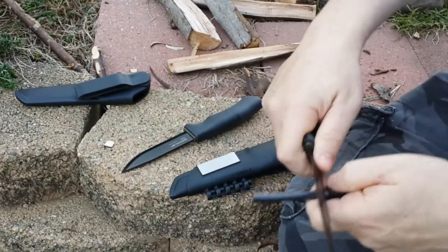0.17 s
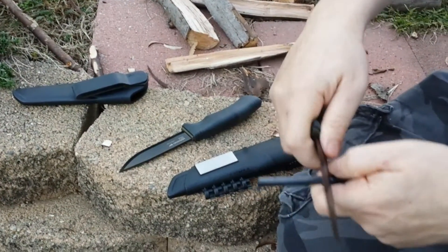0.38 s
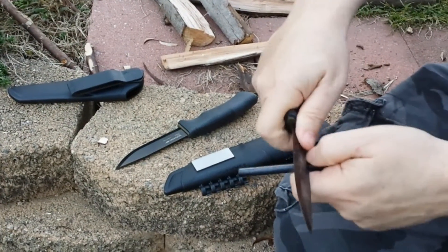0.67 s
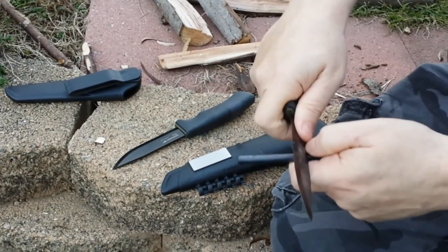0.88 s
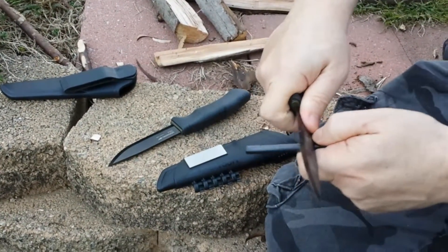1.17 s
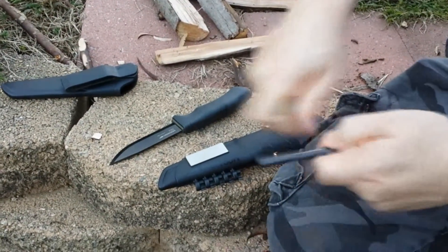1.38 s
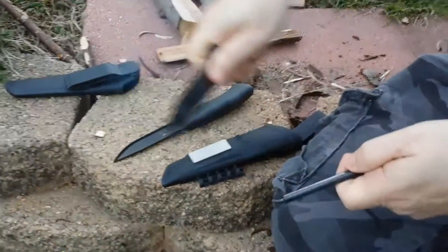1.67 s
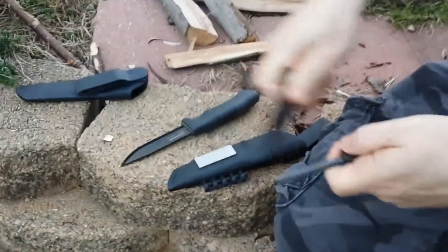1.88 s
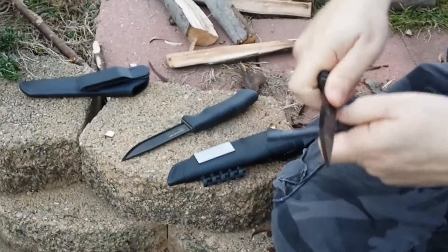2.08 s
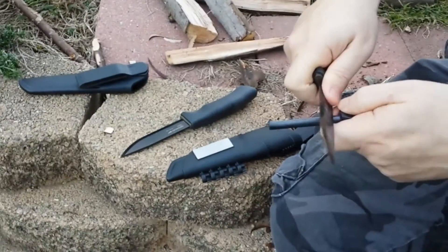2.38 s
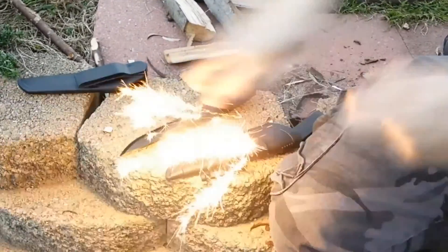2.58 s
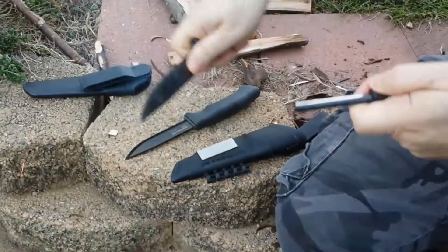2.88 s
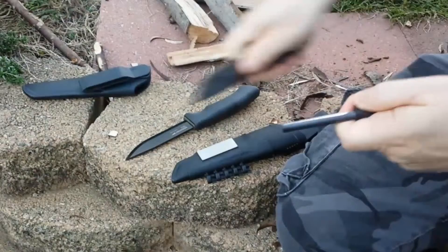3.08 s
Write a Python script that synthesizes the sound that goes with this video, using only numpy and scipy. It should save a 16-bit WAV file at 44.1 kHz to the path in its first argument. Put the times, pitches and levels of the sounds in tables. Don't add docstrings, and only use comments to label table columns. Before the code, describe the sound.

A fire steel is struck twice by a knife spine, close and dry outdoors. Faint crickets, distant traffic and a far creak at 0.25-0.65 s come first, then a light knock and ticks. At 1.24 s a brief rasp snaps at 1.3, sparks hissing and popping until 1.55. Katydid buzzes, handling ticks and a thud at 1.85 follow. A second rasp at 2.4 snaps at 2.46, crackling out by 2.75.

```python
import sys
import numpy as np
from scipy import signal
from scipy.fft import rfft, irfft
from scipy.io import wavfile
from scipy.ndimage import uniform_filter1d

SR = 44100
rng = np.random.default_rng(int(sys.argv[2]) if len(sys.argv) > 2 else 0)


def waveform_to_disk(signal):
    frames = np.transpose(np.atleast_2d(signal))
    scaled = np.clip(frames, -1, 1) * 32767
    samples = np.round(scaled).astype(np.int16)
    wavfile.write(sys.argv[1], SR, samples)


def voltage_ratio(level):
    return 10 ** (np.asarray(level, float) / 20)


N = 143325
T = np.arange(N) / SR
F = np.maximum(np.fft.rfftfreq(N, 1 / SR), 1)
PORTS = np.array([[1], [-1]])


def unit(x):
    return x / np.sqrt(np.mean(x ** 2))


def decay(t, t60):
    return 1000. ** (-t / t60)


def noise(channels=2):
    return rng.standard_normal((channels, N))


def read(points):
    hz, db = np.array(points, float).T
    return np.interp(np.log(F), np.log(hz), db)


def over_time(points, t=T):
    return np.interp(t, *np.array(points, float).T)


def colour(x, db):
    return irfft(rfft(x) * voltage_ratio(db), N)


def band(hz, width_hz):
    return -20 * np.log10(1 + ((F - hz) / (width_hz / 2)) ** 2)


def octaves(hz, width):
    return np.maximum(-12 * (np.log2(F / hz) / width) ** 2, -80)


def thin(x):
    return colour(x, -10 * np.log10(1 + (2000 / F) ** 6))


def curve(tables):
    return sum(voltage_ratio(np.interp(T, *np.array(t, float).T, left=-200, right=-200)) for t in tables)


def gate(start, length, edge=0.009):
    return np.clip(np.minimum(T - start, start + length - T) / edge + .5, 0, 1)


def walk(rate):
    k = int(SR / rate)
    steps = np.repeat(rng.standard_normal(N // k + 1), k)
    return unit(uniform_filter1d(uniform_filter1d(steps, k), k)[:N])


def grains(rate, spread_db, lag_s, side_s=0, count=70000):
    u = rng.random((count, 4)).T
    at = np.cumsum(-np.log(1 - u[0])) / rate * SR
    size = voltage_ratio(spread_db * np.minimum(-np.log(1 - u[1]), 4)) * np.sign(u[2] - .5) * (at < N)
    lag = ((2 * u[3] - 1) * lag_s + np.interp(at / SR, T, side_s + 0 * T)) * SR
    places = [np.clip(at + s * lag, 0, N - 1).astype(int) for s in (.5, -.5)]
    return unit(np.array([np.bincount(place, size, N) for place in places]))


def burst(start, db, shape_db, t60, shared=0.54, size=8192):
    t = T[:size] - T[size // 4]
    x = rng.standard_normal((3, size)) * np.where(t >= 0, decay(np.abs(t), t60), 0)
    x = shared * x[0] + (1 - shared) * x[1:]
    shape = np.interp(np.fft.rfftfreq(size, 1 / SR), F, shape_db)
    x = irfft(rfft(x) * voltage_ratio(shape), size)
    first = int(start * SR) - size // 4
    return np.pad(x * voltage_ratio(db) / np.abs(x).max(), ((0, 0), (first, N)))[:, :N]


def knock(start, db, hz, t60):
    t = T - start
    return voltage_ratio(db) * np.sin(2 * np.pi * hz * t) * (t >= 0) * decay(np.abs(t), t60)


# (frequency [Hz], level [dB])
AIR = [(28, -21), (80, -1), (200, -11), (500, -25), (1200, -32.5), (3200, -34.5), (5500, -30), (15000, -38)]


def air():
    apart_db = np.maximum(-10 * np.log10(1 + (1200 / F) ** 2), -12.5)
    mid, side = colour(noise(), read(AIR) + np.array([0 * F, apart_db]))
    return voltage_ratio(-58.5) * unit(np.array([mid + side, mid - side]))


# (centre [Hz], width [Hz], level [dB])
CHORUS = [(3880, 380, -66), (4200, 380, -68.5), (4713, 400, -72.5)]
# (time [s], level [dB])
CHORUS_LOUDNESS = [(0, -4), (.5, -3), (.8, 0.1), (1.2, 1), (2.1, 0), (2.35, -3.5), (2.95, -0.5), (3.25, -1)]


def cricket_choirs():
    out = 0
    for hz, width_hz, db in CHORUS:
        throb_db = 2.5 * walk(44.75) + over_time(CHORUS_LOUDNESS)
        out = out + unit(colour(noise(), band(hz, width_hz))) * voltage_ratio(db + throb_db)
    return out


# (start [s], length [s], level [dB], pitch [Hz], waver [Hz])
CALLS = [
    (.0, .3, -71, 4280, 110),
    (.46, .05, -75, 7550, 200),
    (.6, .33, -71, 4460, 30),
    (.69, .025, -70, 7600, 250),
    (2.12, .06, -71, 7350, 150),
    (3.0, .075, -74, 7520, 100),
]


def insect_calls():
    out = 0
    for start, length, db, hz, waver_hz in CALLS:
        pitch = hz + waver_hz / 2 * walk(90)
        phase = 2 * np.pi * np.cumsum(pitch) / SR + np.array([[0], [.8]])
        out = out + np.sin(phase) * voltage_ratio(db + 4.5 + 2.6 * walk(58.9)) * gate(start, length)
    return out


CREAK = [.243, .277, .288, .315, .335, .35, .357, .376, .402, .44, .47, .5, .538, .565, .596, .656]


def far_creak():
    pitch = np.interp(CREAK, (CREAK[0], 0.41), (1600, 2140))
    chance = rng.standard_normal((len(CREAK), 2))
    return sum(knock(s, -54 + 0.62 * c[0], hz * (1 + 0.06 * c[1]), .007)
               for s, hz, c in zip(CREAK, pitch, chance))


# (time [s], peak [dB], pitch [Hz], t60 [s])
THUDS = [
    (.687, -45.5, 194, 0.079),
    (.689, -42, 247, 0.13),
    (1.706, -39, 372, 0.039),
    (1.706, -46, 596, 0.034),
    (1.851, -32, 207, 0.013),
]


def thuds():
    return sum(knock(*row) for row in THUDS)


# (time [s], peak [dB],
# centre [Hz], width [octaves], t60 [s])
TICKS = [(0.933, -43, 2200, 2.9, 0.013), (0.976, -52, 1500, 0.98, 0.0071), (1.008, -52.5, 2360, 0.4, 0.01),
         (1.016, -49, 1530, 1, 0.0086), (1.058, -50, 1700, 1.6, 0.018), (1.111, -48.5, 1600, 1.4, 0.058),
         (1.11, -44, 6360, 0.68, 0.051), (1.662, -43, 1600, 3.1, 0.2), (1.671, -30, 6370, 0.55, 0.012),
         (1.671, -41, 10000, 0.77, .006), (1.57, -51.5, 700, 1.4, 0.025), (1.693, -42.5, 5700, 0.37, 0.016),
         (1.705, -36.5, 1500, 2.34, 0.028), (1.894, -49.5, 600, 1.7, 0.01), (2.077, -39, 2000, 2.9, 0.011),
         (2.085, -45.5, 7000, 0.56, .02), (2.441, -40, 804, 0.45, 0.055), (2.689, -40, 1200, 0.75, 0.012),
         (2.697, -37.5, 1240, 0.81, 0.015), (2.703, -42.5, 1690, 0.43, 0.016),
         (3.158, -49.5, 13850, 0.24, 0.017)]


def ticks():
    return sum(burst(s, db, octaves(hz, width), t60) for s, db, hz, width, t60 in TICKS)


# (start [s], length [s], level [dB])
BUZZ = [
    (1.055, 0.069, -60),
    (1.164, 0.059, -57.5),
    (1.56, 0.085, -58),
    (1.673, 0.081, -58.5),
    (1.784, 0.11, -63.5),
]
# (centre [Hz], width [Hz], level [dB])
BUZZ_BANDS = [(7600, 1000, 0), (9000, 1200, -3)]


def katydids():
    buzz = sum(voltage_ratio(db) * unit(colour(grains(1100, 0.75, 0.000098, count=6000), band(hz, width_hz)))
               for hz, width_hz, db in BUZZ_BANDS)
    return buzz * sum(voltage_ratio(db) * gate(start, length, edge=0.06) for start, length, db in BUZZ)


# (time [s], level [dB])
RASP = [
    [(1.24, -55.5), (1.244, -43), (1.249, -47), (1.254, -28), (1.259, -33.5), (1.262, -29.5), (1.272, -27),
     (1.295, -32.5), (1.3, -19.5)],
    [(2.4, -56.5), (2.408, -33), (2.413, -30.5), (2.424, -33), (2.429, -30.5), (2.44, -29), (2.447, -33.5),
     (2.456, -25), (2.472, -32.5)],
]
# (pitch [Hz], level [dB], t60 [s])
STEEL = [
    [(2613, -13.5, 0.036), (4200, -3, 0.0162), (5100, -4.5, .012), (5780, -0.5, 0.012), (6800, -2, 0.011),
     (7500, -4, 0.011), (9350, 0, .009), (10060, -8, 0.0067)],
    [(2420, -21.5, 0.0093), (3400, -17.5, 0.01), (4100, -6, 0.013), (5160, 3, .01), (6330, -3.5, 0.018),
     (7170, -3.5, .012), (8730, -2.5, 0.013), (9280, -7, .009)],
]
# (frequency [Hz], level [dB])
GRIT = [(700, -22), (1700, -21), (2650, -26.5), (4300, -2.5), (9000, -4), (11000, -12.5), (15500, -15.5)]


def modes(table):
    t = T[:1024]
    return np.array([voltage_ratio(db) * np.sin(2 * np.pi * hz * t) * decay(t, t60) for hz, db, t60 in table])


def rasp():
    jolts = grains(4500, 3.5, 0.00022) * voltage_ratio(1.4 * walk(150))
    steel = np.zeros((2, N))
    for table, pressure in zip(STEEL, RASP):
        first = int(pressure[0][0] * SR) - 1024
        span = slice(first, first + 8192)
        ring = 0
        for mode in modes(table):
            drive = (jolts * voltage_ratio(3.0 * walk(110)))[:, span]
            ring = ring + signal.oaconvolve(drive, mode[None], axes=1)[:, :8192]
        steel[:, span] = unit(ring)
    grit = unit(colour(grains(12000, 2.5, 0.00034), read(GRIT)))
    return curve(RASP) * (thin(steel) + voltage_ratio(-3) * grit) * voltage_ratio(-2.5)


# (time [s], peak [dB], pitch [Hz], t60 [s])
SNAPS = [(1.2445, -36, 4400, .02), (1.252, -28.5, 4100, .02), (1.254, -24, 4150, 0.013),
         (1.261, -22.5, 4200, 0.016), (1.261, -27, 9900, .003), (1.2625, -24.5, 4270, .012),
         (1.263, -27, 5860, .012), (1.267, -25, 5720, .01), (1.3, -21.5, 5650, 0.0036),
         (1.3012, -11.5, 5100, 0.0048), (1.3013, -11.5, 9130, 0.0042), (1.3016, -17, 8700, 0.0032),
         (1.3026, -12.5, 6140, 0.004), (1.3034, -21.5, 2600, 0.022), (1.3014, -19, 3120, 0.0035),
         (1.3016, -18, 12900, .002), (1.304, -19, 8800, 0.0041), (1.3041, -20, 5070, 0.007),
         (1.3067, -18, 6220, .005), (2.4123, -28.5, 6000, .01), (2.4187, -26, 8200, 0.0045),
         (2.427, -25, 5100, .02), (2.4289, -31, 7150, 0.011), (2.4355, -27, 7200, .012),
         (2.4525, -20, 3400, .007), (2.4556, -25, 2400, 0.011), (2.4563, -15.5, 8850, .005),
         (2.457, -11.5, 7450, 0.0033), (2.4566, -21, 11800, 0.0027), (2.4579, -13, 4870, 0.0063),
         (2.4582, -7, 4930, .011), (2.4586, -11, 4120, 0.0064), (2.4568, -25.5, 2900, .004),
         (2.4604, -13.5, 7800, 0.0029), (2.4643, -22.5, 4950, .006), (2.4816, -18, 5860, .008),
         (2.4863, -19, 7040, .006)]


def snaps(size=2048):
    rise_s, lag_s, crack_db = 0.00011, .000025, -14.5
    out = np.zeros((2, N))
    chance = rng.standard_normal((len(SNAPS), 2))
    for (start, db, hz, t60), c in zip(SNAPS, chance):
        first = int(start * SR) - size // 32
        span = slice(first, first + size)
        t = np.maximum(T[span] - start - lag_s * (1 + 0.34 * c[0]) * PORTS, 0)
        ring = np.sin(2 * np.pi * hz * t) * (1 - np.exp(-t / rise_s)) * decay(t, t60)
        crack = rng.standard_normal(size) * (t > 0) * decay(t, 0.0018) * voltage_ratio(crack_db)
        out[:, span] += (ring / np.abs(ring.mean(axis=0)).max() + crack) * voltage_ratio(db + c[1] * PORTS)
    return thin(out)


# (time [s], level [dB])
SHOWER = [
    [(1.3, -36), (1.312, -25), (1.35, -22), (1.385, -28), (1.41, -34.5), (1.447, -35), (1.452, -42.5),
     (1.53, -54.5), (1.66, -62.5)],
    [(2.47, -33.5), (2.479, -30.5), (2.483, -23.5), (2.505, -20), (2.53, -26.5), (2.57, -38), (2.6, -38.5),
     (2.63, -49.5), (2.7, -59.5)],
]
# (frequency [Hz], level [dB])
SPARK = [(55, -23), (130, -12), (500, -18), (790, -14.5), (3500, -12), (6800, -0.5), (9200, -8),
         (10500, -14), (15500, -21.5)]
# (frequency [Hz], left minus right [dB])
SPARK_PAN = [(100, -1.5), (380, 3), (1300, 1), (2400, -1), (4400, -1.5), (8100, -7), (15000, -19)]
# (time since shower start [s], lag [s])
SPARK_LAG = [(0, .00011), (.03, .00013), (.09, .000135), (.125, .00024), (.3, .00024)]


def shower():
    first, second = [table[0][0] for table in SHOWER]
    since = T - np.where(T < second, first, second)
    specks = grains(20000, 1.46, .00015, over_time(SPARK_LAG, since))
    spectrum = rfft(specks) * voltage_ratio(read(SPARK) + read(SPARK_PAN) / 2 * PORTS)
    place = np.clip(2 * np.log2(F / 500), 0, 10)
    x = 0
    for k in range(11):
        patch = irfft(spectrum * np.clip(1 - np.abs(place - k), 0, 1), N)
        x = x + patch * voltage_ratio(2.6 * walk(30))
    return unit(x) * curve(SHOWER) * voltage_ratio(3.0 + 0.76 * walk(120))


# (time [s], peak [dB], tail t60 [s])
POPS = [(1.419, -30.5, 0.014), (1.443, -34.5, 0.025), (1.464, -35.5, .2), (1.468, -31, .03),
        (1.474, -25, 0.03), (1.479, -30.5, .015), (1.51, -27.5, 0.039), (2.582, -25.5, 0.025),
        (2.586, -38, 0.026), (2.593, -21, 0.003), (2.598, -40, 0.034), (2.614, -32, 0.042),
        (2.657, -37.5, 0.023), (2.6712, -43, .01), (2.69, -31.5, 0.03), (2.6961, -35.5, .01),
        (2.6966, -28.5, 0.035), (2.726, -43, .02), (2.729, -42, 0.15), (2.7371, -40.5, 0.014),
        (2.745, -41, .02), (2.797, -48, .04), (2.901, -48.5, 0.05)]
# (frequency [Hz], level [dB])
POP = [(300, -12), (1200, -7), (3000, -15.5), (6000, -2), (9000, -3), (12000, -11), (16000, -10.5)]


def pops():
    x, shape_db = 0, read(POP)
    for start, db, t60 in POPS:
        x = x + burst(start, db, shape_db, t60, shared=0.4)
        x = x + burst(start, db + 1, shape_db, .003, shared=0.57, size=1024)
    return x * voltage_ratio(-4 / 2 * PORTS)


def scene():
    around = air() + cricket_choirs() + insect_calls() + katydids()
    handling = far_creak() + thuds() + ticks()
    return around + handling + rasp() + snaps() + shower() + pops()


def band_limit(x):
    return signal.sosfilt(signal.butter(12, 16800, fs=SR, output="sos"), x)


def record(dry):
    mix = colour(dry, -32 * np.clip((F - 15700) / 60, 0, 1))
    return band_limit(mix)


dry = scene()
out = record(dry)
waveform_to_disk(out)
```